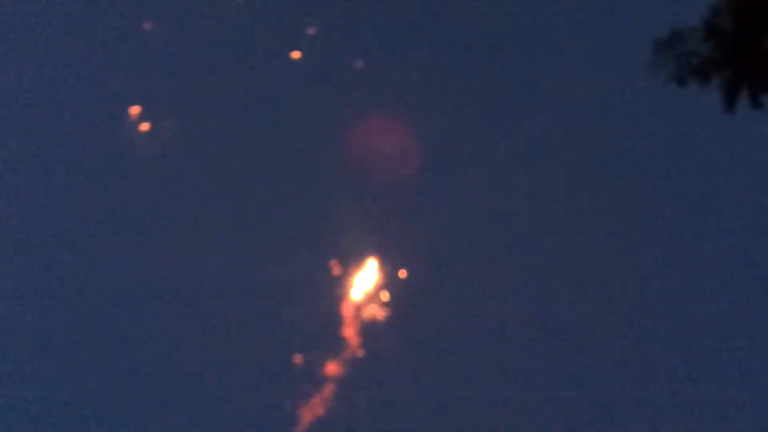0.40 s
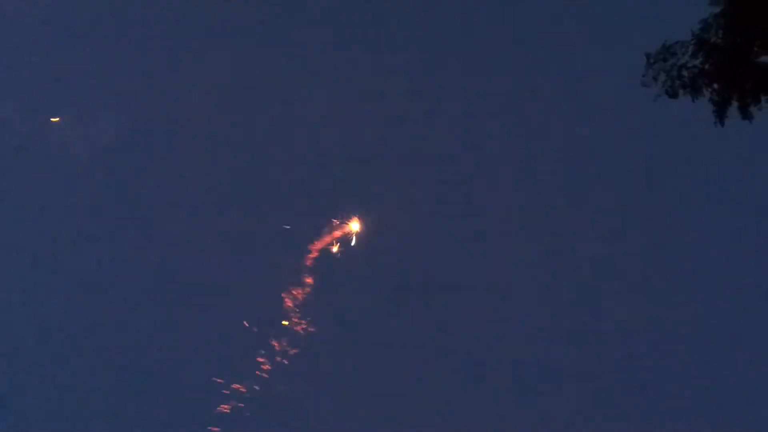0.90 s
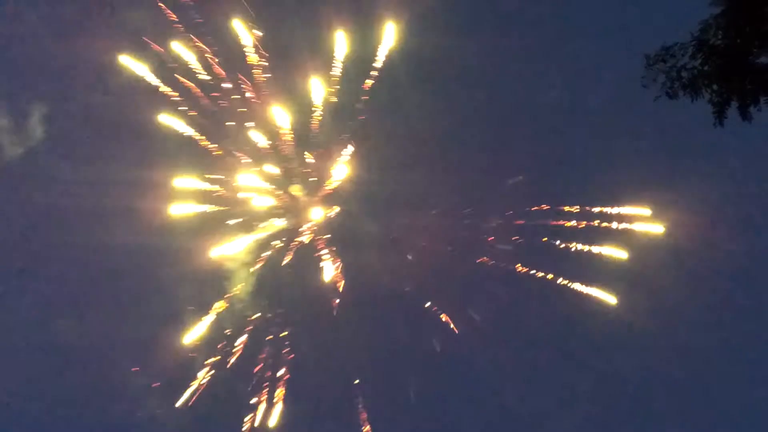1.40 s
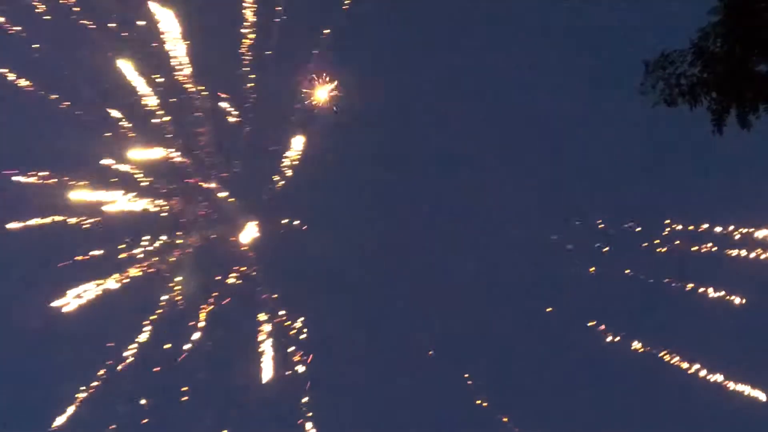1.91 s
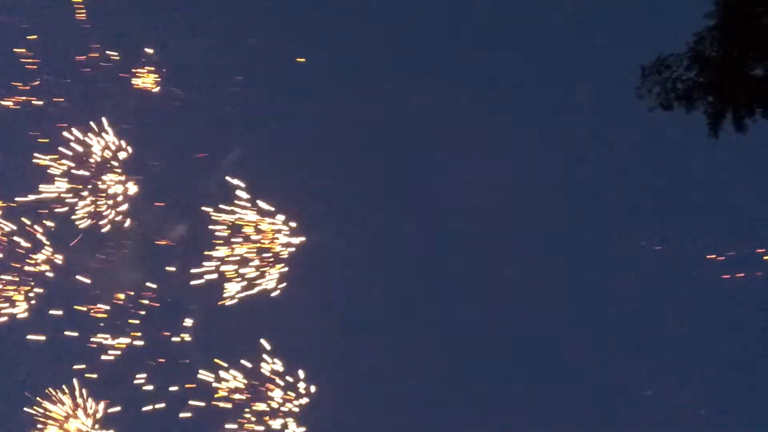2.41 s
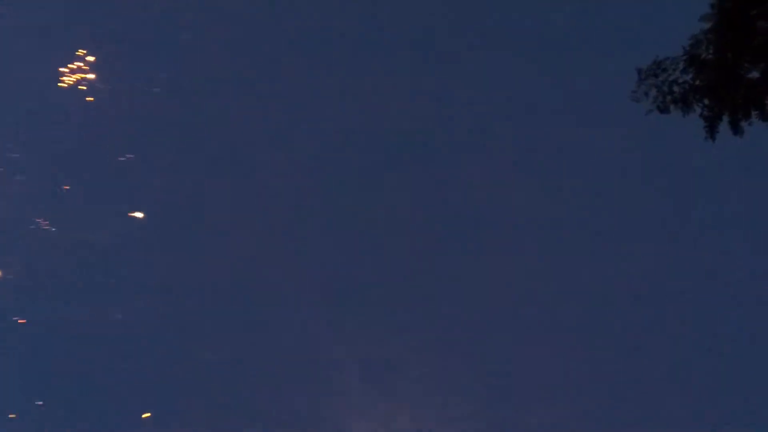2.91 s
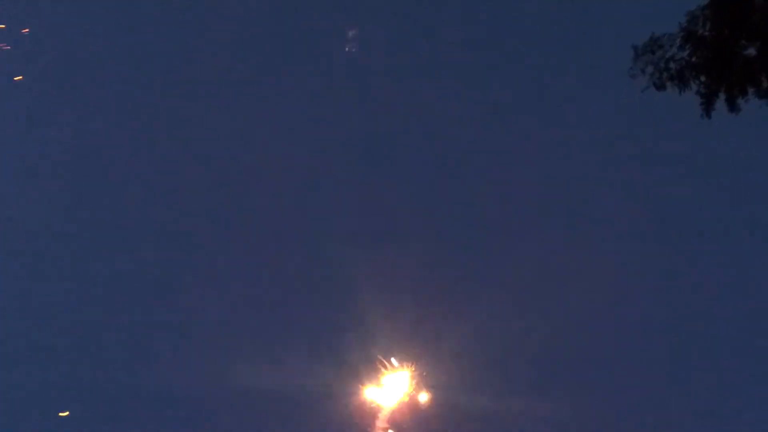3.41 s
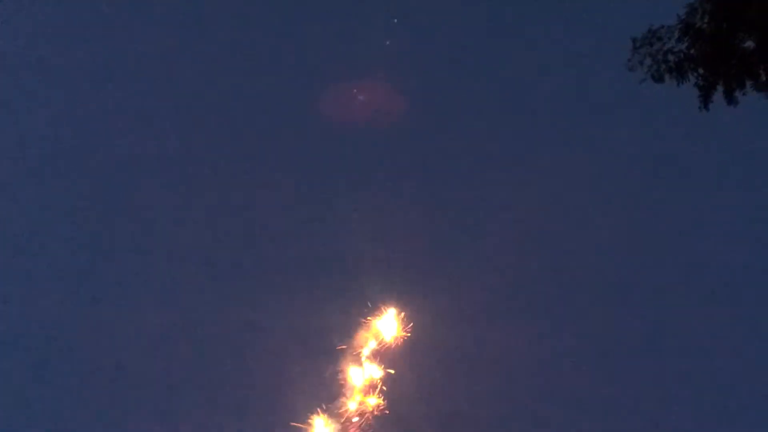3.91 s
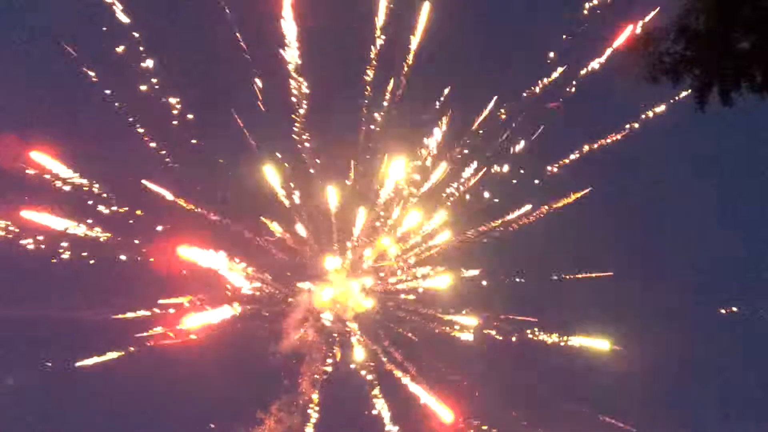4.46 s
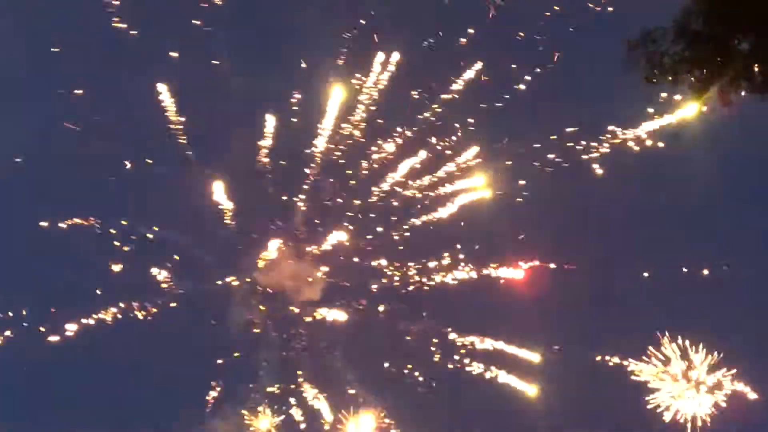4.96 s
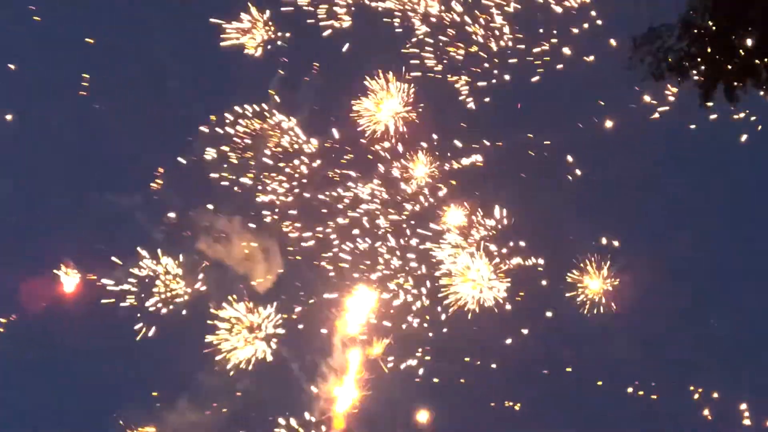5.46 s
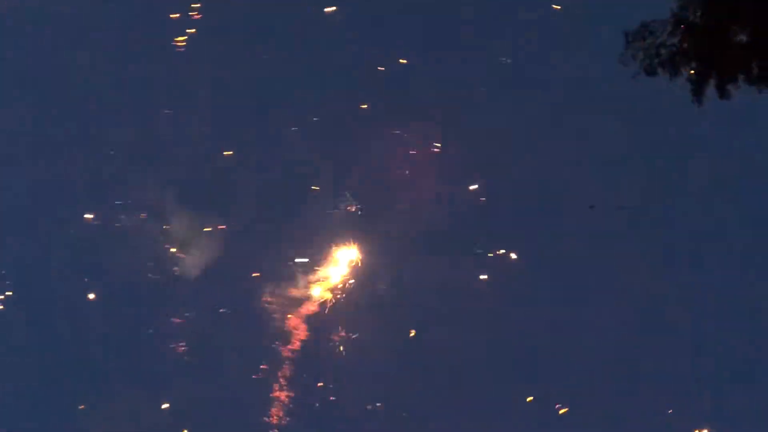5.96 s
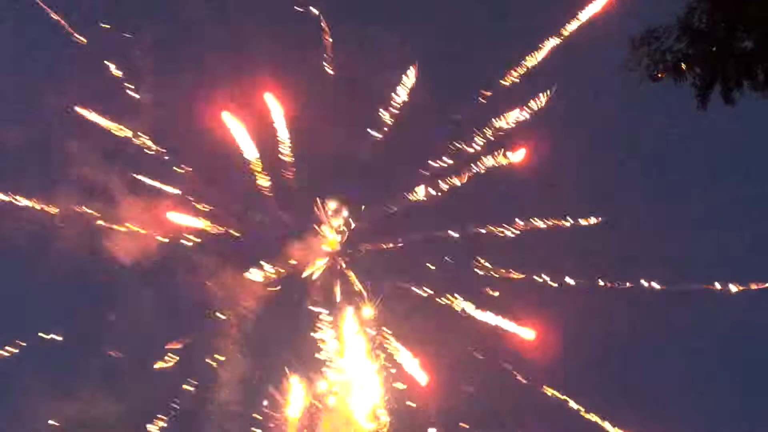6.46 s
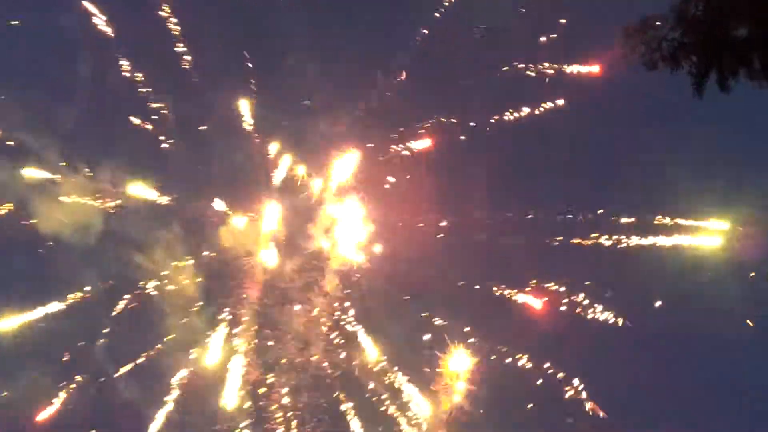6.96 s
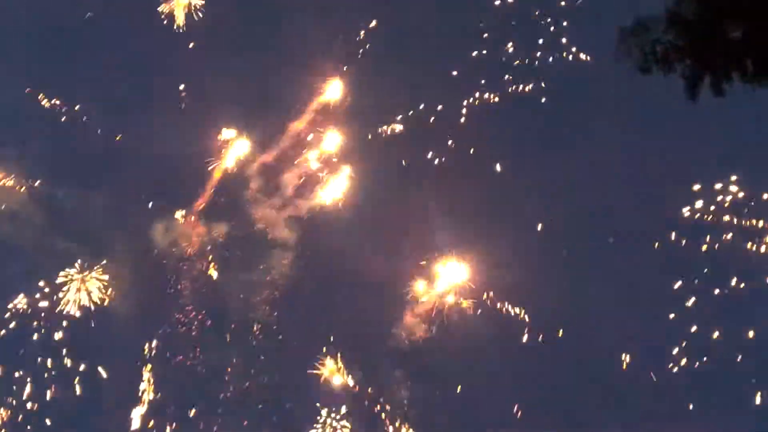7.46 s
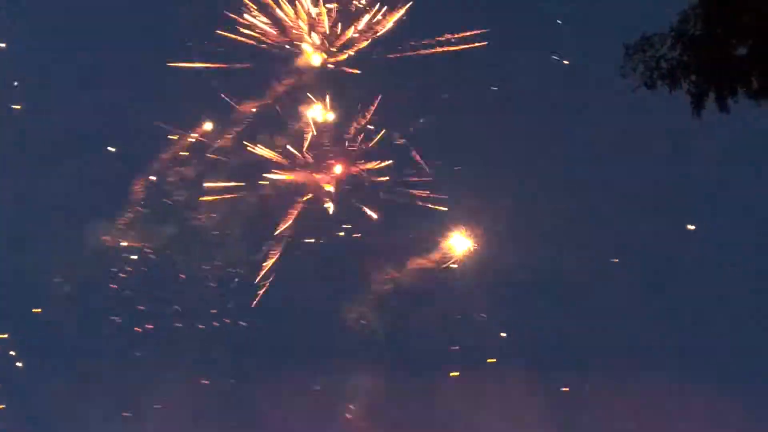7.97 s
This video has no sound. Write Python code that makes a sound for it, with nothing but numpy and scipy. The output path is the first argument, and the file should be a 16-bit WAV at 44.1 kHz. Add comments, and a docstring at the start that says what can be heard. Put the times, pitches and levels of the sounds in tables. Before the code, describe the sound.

A multi-shot firework outdoors at dusk: thumping lift charges, booming overhead bursts with rolling echoes, and dense sharp crackling swarms of sparks.

```python
"""Crackling stars are heard first, thin over a low bed of far echoes, at a multi-shot firework outdoors at dusk.
Lift charges then thump with a falling puff and a rush of echoes; shells burst overhead as shock waves that roll.
The crackle is made of single shocks, from lone pops to a dense roar; ground, trees and houses answer.
A small microphone takes it all in mono, and its input stage clips the loudest swings."""
import sys
import numpy as np
from scipy import signal
from scipy.fft import rfft, irfft, next_fast_len
from scipy.io import wavfile
from scipy.ndimage import map_coordinates

SR = 44100
rng = np.random.default_rng(int(sys.argv[2]) if len(sys.argv) > 2 else 0)


def elevation(decibels):
    """Turn decibel levels (scalar or array-like) into linear amplitude ratios."""
    levels = np.asarray(decibels, float)
    return 10 ** (levels / 20)


def transcribe(u):
    """Save the signal u as a 16-bit wav file named by the first command-line argument.

    u: samples, shape (n,) or (channels, n), limited to [-1, 1]; the rate is SR.
    q: integer samples, one column per channel.
    """
    v = np.clip(np.atleast_2d(u).T, -1, 1)
    q = np.round(v * 32767).astype(np.int16)
    wavfile.write(sys.argv[1], SR, q)


N = 357651  # samples, about 8.1 s


def along(points, hz):
    """Reads (frequency_hz, value) points on a log frequency axis."""
    point_hz, value = np.transpose(points)
    return np.interp(np.log(hz + 1), np.log(point_hz + 1), value)


def colour(spectrum, size=4096):
    """Causal minimum-phase response of energy 1 with this spectrum, by folding its cepstrum."""
    gain = elevation(along(spectrum, np.fft.rfftfreq(size, 1 / SR)))
    cepstrum = irfft(np.log(gain + 1e-6), size)
    cepstrum[1:size // 2] *= 2
    cepstrum[size // 2 + 1:] = 0
    response = irfft(np.exp(rfft(cepstrum)), size)[:size // 2]
    return response / np.linalg.norm(response)


def noise(spectrum, size):
    """Coloured noise of rms about 1, taken after the filter has filled."""
    white = rng.standard_normal(size + 2048)
    return signal.fftconvolve(white, colour(spectrum))[2048:][:size]


def dying(x, t60s, stretch):
    """Lets each frequency of x die at its own speed: its t60 times stretch."""
    hz, t, z = signal.stft(x, SR, nperseg=256)
    t60 = stretch * along(t60s, hz)[:, None]
    return signal.istft(z * elevation(-60 * t / t60), SR, nperseg=256)[1][:len(x)]


def wander(db, spacing, at):
    """Smooth random level in dB at sample positions, with a new random value every spacing samples."""
    values = rng.standard_normal(int(np.max(at)) // spacing + 4)
    return db * map_coordinates(values, [at / spacing])


def add(track, s, sound):
    """Lays a sound on the track at time s."""
    part = track[round(s * SR):][:len(sound)]
    part += sound[:len(part)]


def blast(ms, size):
    """Shock front then suction; the capsule swings negative first."""
    u = np.arange(size) / (ms * SR / 1000)
    return -(1 - u) * np.exp(-u)


def pops(s, size, big):
    """Sharp shocks at times s, each followed by its near bounces; big stars carry more bass."""
    # Near bounces off housing, ground and wall: late_ms, level_db, scatter_ms
    pop_echoes = [(.3, -6, .03), (1.45, -8, .07), (2.95, -11, .1)]
    # Pop of a big star at the microphone: frequency_hz, level_db (per Hz)
    big_star = [(40, -39), (250, -4.5), (700, 3), (1800, 1.5), (3130, 2.5), (4200, 0), (7270, 1),
                (8200, -13), (10500, -11), (13000, -7), (16000, -7)]
    # Pop of a small star: frequency_hz, level_db (per Hz)
    small_star = [(40, -58.5), (200, -1.5), (700, -7), (2000, -6.5), (3300, -2.5), (4300, -3), (7200, 1),
                  (8400, -5.5), (10300, -14.5), (13300, -14.5), (16000, -21.5)]
    spikes = np.zeros((2, N + SR))  # one row for big stars, one for small
    direct = (0, 0, 0.0045)
    for k, (ms, db, scatter) in enumerate([direct] + pop_echoes):
        late = np.abs(ms + scatter * rng.standard_normal(len(s))) / 1000
        arrival = np.round((s + late) * SR).astype(int)
        sign = 1 if k == 1 else -1  # the nearest bounce is inverted against the rest
        for row, share in zip(spikes, (big, 1 - big)):
            row += np.bincount(arrival, sign * size * share * elevation(db), N + SR)
    coloured = signal.fftconvolve(spikes, [colour(big_star), colour(small_star)], axes=1)
    return coloured.sum(0)[:N]


def swarm():
    """Each swarm kindles, peaks and burns out; louder means more pops a second, until they merge into a roar."""
    # Swarms of crackling stars: first_pops_s, densest_s, burnt_out_s, level_db, big_star_share (0-1)
    swarms = [(-0.6, -0.003, 0.27, -15, 0.15), (0.0, 0.66, 1.05, -16.5, 0.2),
              (2.753, 2.965, 3.62, -14, 0.11), (3.155, 3.85, 4.57, -11, 0.1), (4.62, 4.847, 5.3, -21, 0),
              (4.736, 5.468, 5.9, -8.5, 0.36), (5.6, 5.955, 6.32, -14.5, 0.05),
              (6.266, 6.714, 7.9, -9, 0.04), (6.918, 7.55, 8.2, -10.5, 0.38)]
    kindle, burn_out = 1.057, 0.96  # exponents: the higher, the later a swarm fills and the sooner it thins
    most = 6000  # pops a second at most
    small_db, spread_db = 2, 3  # energy of a small pop and its scatter
    big_extra_db = 10  # energy of a big star's pop over a small one's
    draw = rng.random((round(most * N / SR), 3))
    s = draw[:, 0] * N / SR
    first, densest, out, db, share = np.transpose(swarms)[:, :, None]
    filling = np.clip((s - first) / (densest - first), 0, 1) ** kindle
    thinning = np.clip((out - s) / (out - densest), 0, 1) ** burn_out
    fullness = np.sin(np.pi / 2 * np.where(s < densest, filling, thinning))
    # big stars pop louder, so fewer make the level
    rate = fullness * SR * elevation(db - small_db - big_extra_db * share) ** 2
    total = np.cumsum(rate, axis=0) + 1e-9
    owner = np.argmax(total >= draw[:, 2] * total[-1], axis=0)  # the swarm that each star belongs to
    big = share[owner, 0]
    clumps = wander(1.19, 500, s * SR)
    chance = total[-1] * elevation(clumps) ** 2 / most  # that this star is alight
    alight = np.clip(4 * (chance / draw[:, 1] - 1), 0, 1)
    size = alight * np.sqrt(np.maximum(chance, 1))  # past the most pops a second, pops grow instead
    scatter = spread_db * (rng.standard_normal(len(s)) - 0.5)
    size *= elevation(small_db + big_extra_db * big + scatter)
    return pops(s, size, np.clip(big, 0, 1))


def crackle():
    """Single pops and swarms, with a long thin answer from the trees."""
    # Star pops that stand alone while the crackle is thin: start_s, energy_db
    lone_pops = [(0.8797, 2), (0.8854, 5), (0.8972, 4), (0.9208, -5), (0.9293, -1), (0.9446, 8.5),
                 (0.9714, -2), (0.9964, 6), (1.0122, 4), (1.0376, -6.5), (1.1196, 4.5), (1.1369, 6.5),
                 (2.0396, 11.5), (2.1521, 15), (2.1563, 12), (2.2396, 9), (2.252, 17), (2.3632, 15),
                 (2.3798, 8), (2.3904, 5), (2.3938, 20.5), (2.4212, 11), (2.4322, 12), (2.4354, 10),
                 (2.4987, 8), (2.5123, 16), (2.5431, 18.5), (2.5552, 15), (2.57, 9), (2.59, 12), (2.595, 8),
                 (2.5985, 19), (2.6167, 10), (2.625, 11), (2.6292, 12), (2.6533, 12), (2.709, 1),
                 (2.7197, -3), (2.741, 13), (2.7438, 13.5), (2.7773, 3), (2.8058, 17.5), (4.62, 10),
                 (4.653, -4), (4.659, 15), (4.666, 7), (4.826, 1)]
    # Foliage throws back mostly treble: frequency_hz, level_db (per Hz)
    leaves = [(200, -11), (1800, -8), (3000, -4), (6900, -1.5), (9000, 3.5), (16000, -11)]
    # Trees answer each pop: frequency_hz, t60_s (before the stretch of 0.66 below)
    pop_tail = [(300, 0.32), (2000, 0.98), (8000, 0.63), (14000, 0.067)]
    wet_db, rise_s = -9.3, 0.005
    s, db = np.transpose(lone_pops)
    big = np.clip((db - 2.5) / 9, 0, 1)  # louder pops come from bigger stars
    dry = pops(s, elevation(db), big) + swarm()
    wet, step, t = np.zeros(N), SR // 8, np.arange(SR * 3 // 4) / SR
    for start in range(0, N, step):  # the stars drift, so their echoes keep changing
        tail = dying(noise(leaves, len(t)), pop_tail, 0.66)
        tail *= 1 - np.exp(-t / rise_s)
        tail /= np.linalg.norm(tail)
        add(wet, start / SR, signal.fftconvolve(dry[start:start + step], tail))
    return dry + elevation(wet_db) * wet


def far_air():
    """Coloured noise for the far echoes and evening air, slowly swelling and sinking."""
    # Far echoes and evening air: frequency_hz, level_db (per Hz)
    air_spectrum = [(30, -18.5), (330, -3), (900, -2.5), (2500, -8.5), (3200, -16), (7500, -21),
                    (10000, -33), (16000, -71)]
    roll = wander(2, 1500, np.arange(N))
    return elevation(-37.5 + roll) * noise(air_spectrum, N)


def lifts():
    """A puff whose pitch falls as the tube empties, two slaps off walls, then a swelling rush of echoes."""
    # Lift charges leaving the tubes: start_s, thump_db, rush_db
    charges = [(1.1583, -13, -54), (1.85, -27, -39.5), (2.2732, -2.2, -11), (3.144, 1, -9.5),
               (3.623, -16, -36), (4.267, -1.5, -11), (4.6742, 0, -9), (5.798, 1, -10),
               (5.836, -1.5, -11.5), (5.937, -1, -7), (5.978, -4, -9), (6.028, -1, -12)]
    # Slaps of the thump off walls: late_s, level_db (re thump)
    thump_echoes = [(0.023, -9.5), (0.05, -14)]
    # A lift thrown back by the houses, before dulling: frequency_hz, level_db (per Hz)
    rush_spectrum = [(40, -42), (80, 3.5), (340, 10), (800, 7), (1800, 13), (3200, 7.5), (7400, 9),
                     (10000, -6), (16000, -8)]
    out, t = np.zeros(N), np.arange(SR * 6 // 10) / SR
    # pitch falls from 372 Hz towards 132 Hz
    puff = np.sin(2 * np.pi * 240 * (0.55 * t + 0.004 * (1 - np.exp(-t / 0.004)))) * np.exp(-t / 0.005)
    puff += elevation(-7) * np.sin(2 * np.pi * 105 * t) * np.exp(-t / 0.0058)
    crack = 2.5 * blast(0.15, len(t))  # at the muzzle
    crack += elevation(-2) * np.sin(2 * np.pi * 5600 * t) * np.exp(-t / 0.002)  # the housing rings with it
    crack_fades = 0.8  # extra dB that the crack loses for each dB a lift is fainter
    far_dull = 0.28  # dB an octave that the rush loses for each dB a lift is fainter
    full_s, rise_db_per_s = 0.024, 850  # echoes swell as the walls answer
    near_s, far_db, far_t60_s = 0.092, -10, 0.93  # near walls fall silent, far ones die slowly
    fall = 1 / (1 + (t / near_s) ** 12) + elevation(far_db - 60 * t / far_t60_s) ** 2  # power
    swell = elevation(rise_db_per_s * np.minimum(t - full_s, 0)) * np.sqrt(fall / fall.max())
    for s, db, rush_db in charges:
        add(out, s, elevation(db) * (puff + elevation(crack_fades * db) * crack))
        for late, echo_db in thump_echoes:
            slap = noise([(60, -17), (280, 13.0), (600, 0.5), (1500, -65)], len(t)) * np.exp(-t / 0.0059)
            add(out, s + late, elevation(db + echo_db) * slap)
        dulled = [(hz, level + far_dull * db * np.log2(hz)) for hz, level in rush_spectrum]
        grain = wander(3, 90, np.arange(len(t)))  # many separate small echoes
        add(out, s, elevation(rush_db + grain) * swell * noise(dulled, len(t)))
    return out


def bursts():
    """A shock wave and boxy first slaps, then lumpy echoes rolling in from all round, the treble dying first."""
    # Shells bursting: start_s, level_db (blast, slaps and echoes), echo_db (re level), echo_length_factor
    shells = [(1.247, -8.5, 1.9, 1.014), (4.0929, -4.5, -1, 1.74), (4.338, -6.5, 1, 1.54),
              (6.2544, -5, -0.4, 1.76), (6.551, -6.5, -0.5, 1.1), (7.963, -5, 1, 1.6)]
    # First slaps off the houses: frequency_hz, level_db (per Hz)
    body_spectrum = [(100, -21.5), (300, -4.5), (600, 2.5), (900, -7), (1600, -10), (4000, -75)]
    # Echoes of a burst: frequency_hz, level_db (per Hz)
    boom = [(30, -37), (60, -10), (230, -9), (500, -11), (870, -9), (1300, -9.5), (2440, -8.5),
            (3100, -11.5), (6500, -9), (9500, -17.5), (16000, -27)]
    # Decay of those echoes: frequency_hz, t60_s (before the length factor of each shell)
    boom_tail = [(60, 0.62), (400, 1), (2000, 0.95), (8000, 0.64), (15000, 0.24)]
    body_db, body_t60_s = 4, 0.4
    out, size = np.zeros(N), SR * 3 // 2
    t = np.arange(size) / SR
    for s, db, echo_db, stretch in shells:
        lumps = wander(1.6, 600, np.arange(size))
        roll = dying(noise(boom, size), boom_tail, stretch) * elevation(echo_db + lumps)
        body = noise(body_spectrum, size) * elevation(body_db + lumps - 60 * t / body_t60_s)
        add(out, s, elevation(db) * (3 * blast(1.0, size) + body + roll))
    return out


def scene():
    """All sources at one point, heard on both channels alike."""
    mono = crackle() + far_air() + lifts() + bursts()
    return np.array([mono, mono])


def band_limit(x):
    """A steep low-pass at the top of the band."""
    return signal.sosfilt(signal.butter(12, 16390, fs=SR, output="sos"), x)


def record(dry):
    """The housing colours the middle, the input stage clips the loudest swings, bass rolls off, the top is cut."""
    # Housing of the microphone: frequency_hz, gain_db
    mic_housing = [(330, 2.5), (430, 0), (560, -3), (760, 3), (1100, -1), (2100, 1.5), (2600, 1.5),
                   (3200, -2), (3900, 1)]
    top, hard = 0.73, 7  # clipping ceiling and sharpness of its knee
    low_hz, top_hz = 70, 15750  # bass roll-off and sharp end of the band
    size = next_fast_len(N + SR // 4)
    hz = np.fft.rfftfreq(size, 1 / SR)
    heard = irfft(rfft(dry, size) * elevation(along(mic_housing, hz)), size)
    clipped = heard / (1 + np.abs(heard / top) ** hard) ** (1 / hard)
    band = hz ** 2 / (low_hz ** 2 + hz ** 2) * (hz < top_hz)
    kept = irfft(rfft(clipped) * band, size)[:, :N]
    return band_limit(kept)


dry = scene()
out = record(dry)
transcribe(out)
```